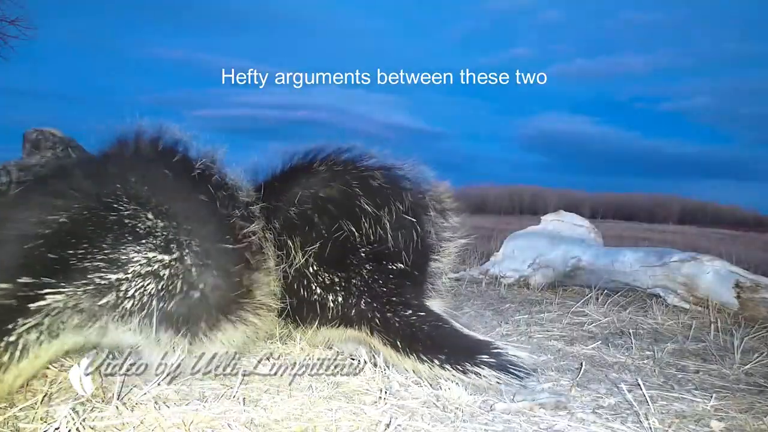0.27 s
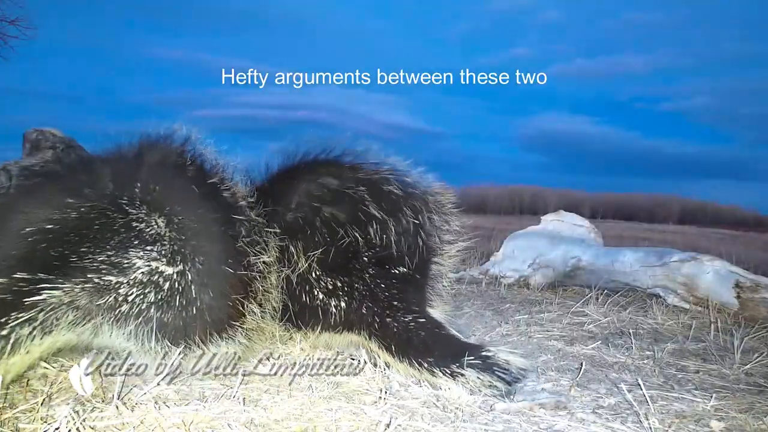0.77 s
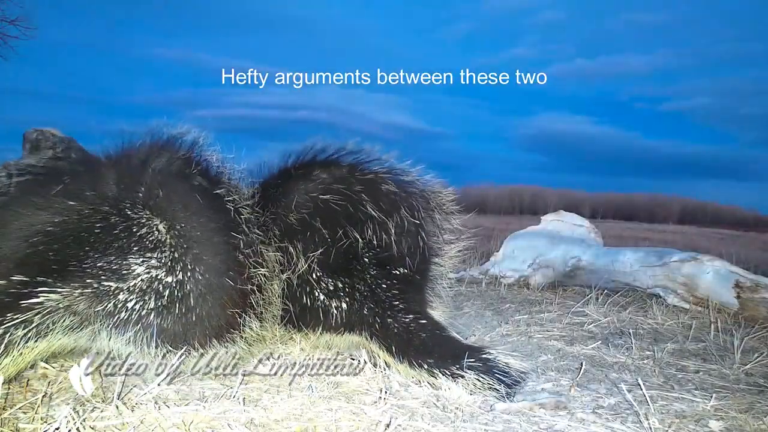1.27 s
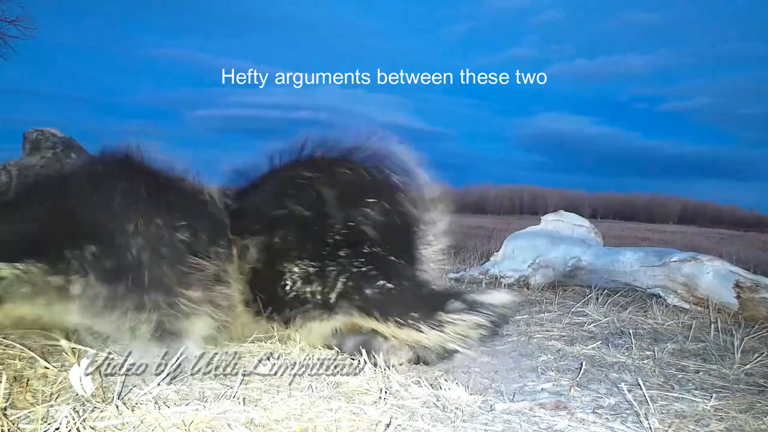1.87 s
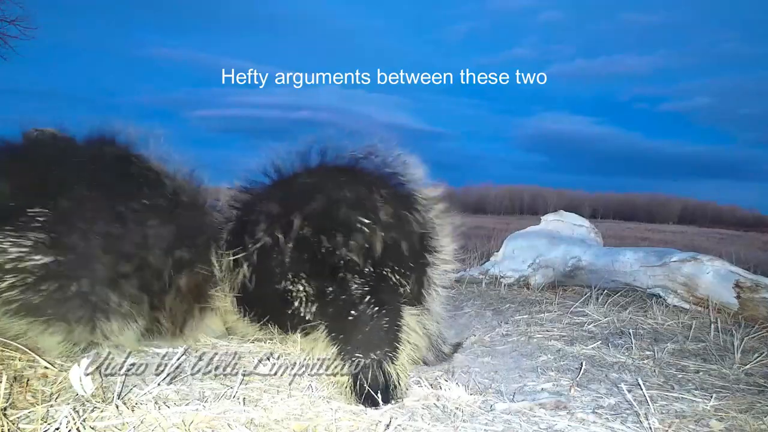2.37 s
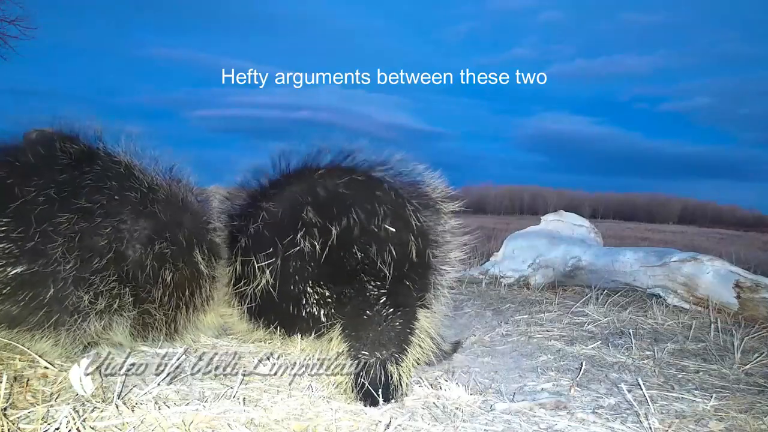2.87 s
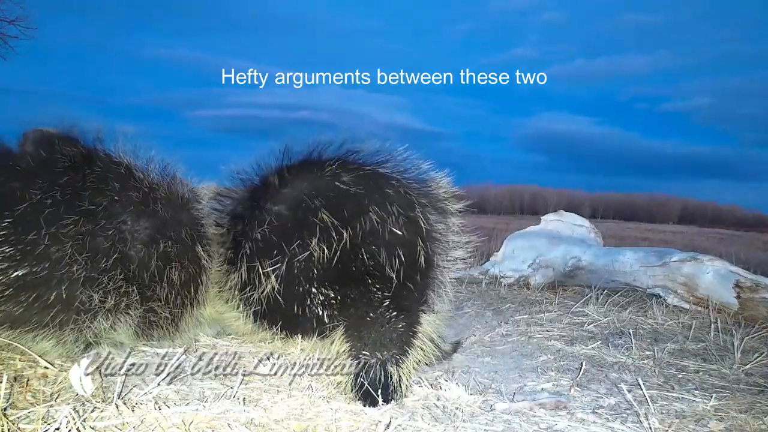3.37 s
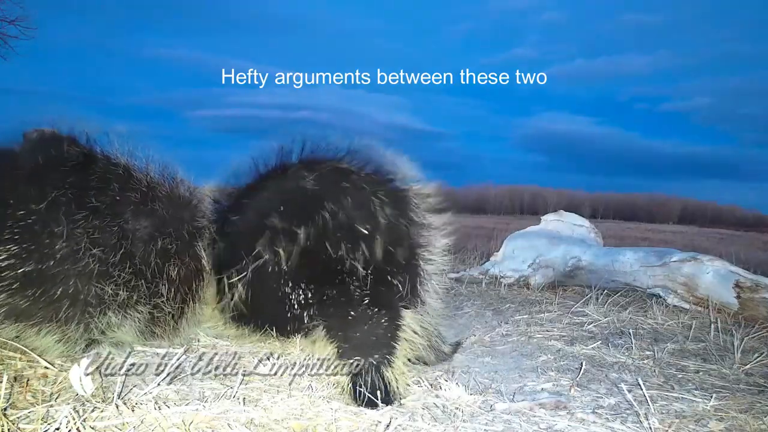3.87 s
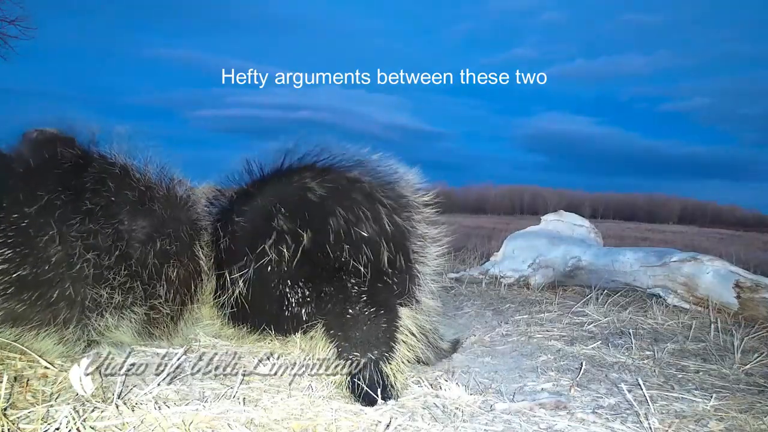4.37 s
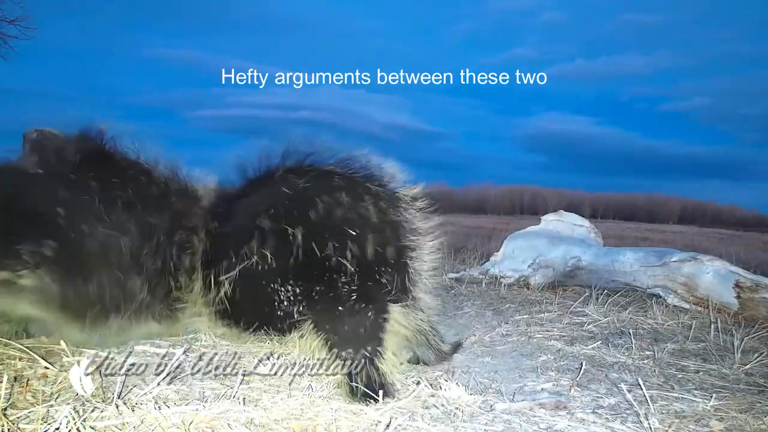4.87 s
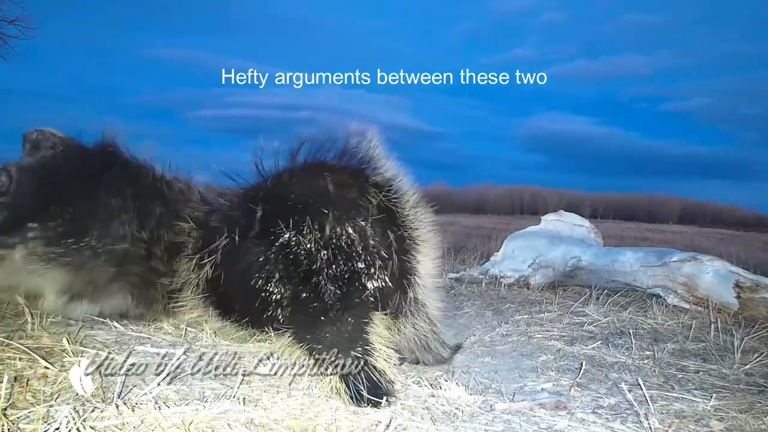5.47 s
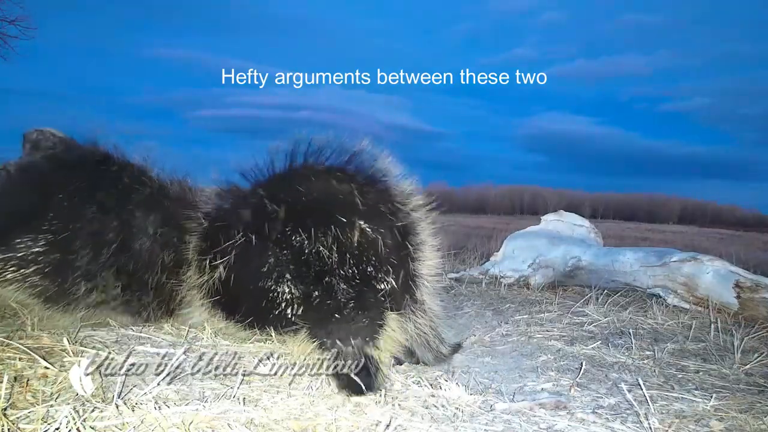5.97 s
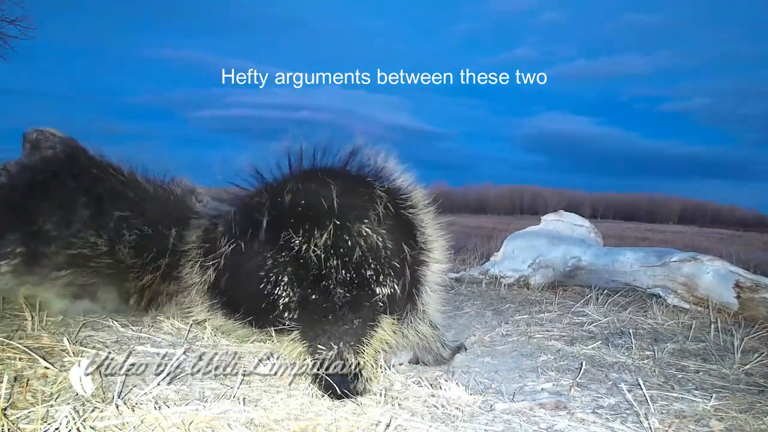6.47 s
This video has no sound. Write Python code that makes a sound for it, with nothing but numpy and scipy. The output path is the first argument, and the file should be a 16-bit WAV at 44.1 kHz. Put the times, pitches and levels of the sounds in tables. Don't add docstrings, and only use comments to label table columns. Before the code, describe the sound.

Close outdoor pickup of two porcupines arguing on straw. A faint low groan dies away, then mostly wind rumble until a high yelp falls quickly into a long buzzing moan. Gusts thump hard against the microphone around three seconds. A curt yelp answers, then another long-winded one, and a last, highest yelp with a short fading groan. Thin hiss, faint straw crackle and nostril puffs sit underneath.

```python
import sys
import numpy as np
from scipy import signal
from scipy.fft import rfft, irfft, next_fast_len
from scipy.io import wavfile
from scipy.ndimage import uniform_filter1d, map_coordinates

SR = 44100
rng = np.random.default_rng(int(sys.argv[2]) if len(sys.argv) > 2 else 0)


def gain_from_decibels(decibels):
    exponent = np.asarray(decibels, float) / 20
    return 10 ** exponent


def store_pcm(level_fs):
    pcm = np.round(np.clip(level_fs, -1, 1) * 32767).astype(np.int16)
    wavfile.write(sys.argv[1], SR, np.atleast_2d(pcm).T)


N = 296793


def unit(x):
    return x / np.sqrt(np.mean(x ** 2) + 1e-20)


def wobble(rate):
    knots = rng.standard_normal(int(N * rate / SR) + 4)
    return map_coordinates(knots, [np.arange(N) * rate / SR])


def noise(spectrum):
    m = next_fast_len(N + 8192)
    hz, db = np.transpose(spectrum)
    log_hz = np.log(np.fft.rfftfreq(m, 1 / SR) + 0.36)
    gain = gain_from_decibels(np.interp(log_hz, np.log(hz), db, left=-120, right=-120))
    return unit(irfft(rfft(rng.standard_normal(m)) * gain, m)[:N])


def mode(f, hz, width):
    return 1j * f * width / (hz * hz - f * f + 1j * f * width)


def add(track, s, shape, lead=0):
    start = max(round(s * SR) - lead, 0)
    track[start:start + len(shape)] += shape[:len(track) - start]


def bursts(t, table):
    return sum(gain_from_decibels(db) * np.exp(-((t - s) / spread) ** 2) for s, spread, db in table)


# frequency in Hz, level in dB.
HISS_SPECTRUM = [(300, 15), (1500, 8), (5000, 0.5), (14000, -0.5), (15500, -3)]
# start in seconds, end in seconds, change of gain in dB.
GAIN_DUCKS = [
    (0.243, .387, -2.5),
    (2.83, 2.94, -3),
    (3.208, 3.324, -4.5),
    (4.393, 4.491, -3.5),
]


def preamplifier_hiss():
    t = np.arange(N) / SR
    gain_db = sum(db * ((t > start) & (t < end)) for start, end, db in GAIN_DUCKS)
    return gain_from_decibels(-60.5 + gain_db) * noise(HISS_SPECTRUM)


# time in seconds, jump of the signal in dB, direction as a sign.
GAIN_STEPS = [(.0002, -41, 1), (.2408, -22, 1), (.281, -39, -1), (.3356, -30, 1), (.3873, -43, 1),
              (2.838, -36, -1), (2.8673, -35, -1), (2.9402, -33, 1), (3.2029, -22, 1), (3.3173, -33, 1),
              (4.3605, -28, 1), (4.4912, -39, -1), (4.562, -40, 1)]


def gain_jumps():
    jumps = np.zeros(N)
    drain = np.exp(-np.arange(SR // 5) / SR / 0.051)
    for s, db, sign in GAIN_STEPS:
        add(jumps, s, np.sign(sign) * gain_from_decibels(db) * drain)
    return jumps


# frequency in Hz, level in dB.
ENGINE_TONES = [(380, -62), (325, -68)]
# time in seconds, level in dB.
ENGINE_FADE = [(0, -4.5), (1.5, 6), (3, -19), (6.73, -6)]


def engine_drone():
    t = np.arange(N) / SR
    fade_db = np.interp(t, *np.transpose(ENGINE_FADE))
    out = np.zeros(N)
    for hz, db in ENGINE_TONES:
        level = gain_from_decibels(db + fade_db + 3.1 * wobble(3.6))
        out += level * np.sin(2 * np.pi * hz * t + 1.3 * wobble(8))
    return out


# time in seconds, heave level in dB.
WIND_LULL = [(0, -19), (0.65, -34.5), (1.3, -30.5), (1.7, -28.5), (2.45, -32.5), (3.05, -26), (3.75, -23),
             (4.05, -28.5), (4.55, -18.5), (5.3, -28), (5.9, -30.5), (6.73, -28)]
# time in seconds, heave in dB, buffet in dB, rise and fall time in seconds.
WIND_GUSTS = [(0.09, -13.5, -28, 0.074), (0.24, -4, -16, 0.054), (0.451, -6.5, -18, 0.042),
              (0.8, -19.5, -38.5, 0.16), (1.011, -4.5, -21, 0.041), (1.63, -17.5, -46, 0.024),
              (1.7, -19.5, -37, 0.053), (1.88, -11, -21, 0.052), (2.121, -13.5, -29, 0.045),
              (2.28, -16.5, -33, 0.051), (2.652, -9.5, -15.5, 0.049), (2.82, -5, -7, 0.044),
              (3.194, 0, -4, 0.034), (3.355, -8, -19, 0.024), (3.49, -14.5, -35, 0.039),
              (3.635, -14.5, -40, 0.031), (4.15, -9, -16, 0.043), (4.25, -22, -16.5, 0.06),
              (4.345, -5.5, -7.5, 0.028), (4.42, -5.5, -12.5, 0.042), (4.6, -17, -19.5, 0.14),
              (4.73, -5.5, -15, 0.028), (5, -8.5, -21, 0.062), (4.88, -18.5, -38, 0.044),
              (5.21, -15.5, -30, 0.049), (5.42, -11.5, -29, 0.036), (5.52, -13.5, -24.5, 0.076),
              (5.865, -13.5, -17, 0.038), (6.15, -18.5, -16.5, 0.066), (6.489, -23, -31.5, 0.048)]


def gusts():
    t = np.arange(0, N, 64) / SR
    s, heave_db, buffet_db, span = np.transpose(WIND_GUSTS)[..., None]
    distance = abs(t - s) / span
    lull = gain_from_decibels(np.interp(t, *np.transpose(WIND_LULL)))
    heave_gusts = np.linalg.norm(gain_from_decibels(heave_db) * np.exp(-distance), axis=0)
    buffet_gusts = np.linalg.norm(gain_from_decibels(buffet_db) * np.exp(-distance / 0.67), axis=0)
    heave = np.hypot(lull, heave_gusts)
    buffet = np.hypot(lull * gain_from_decibels(-9), buffet_gusts)
    return [np.interp(np.arange(N) / SR, t, c) for c in (heave, buffet)]


def evened(x, seconds):
    envelope = abs(signal.hilbert(x, next_fast_len(N))[:N])
    return unit(x / (uniform_filter1d(envelope, size=round(seconds * SR)) + .25))


# frequency in Hz, level in dB per Hz.
HEAVE_SPECTRUM = [(2, -36), (5, -10.5), (10, 3.5), (20, 2.5), (28, -8.5), (45, -30)]
BUFFET_SPECTRUM = [(15, -49), (28, -2), (60, -1), (100, -17.5), (170, -30.5), (400, -49)]
BREEZE_SPECTRUM = [(20, -41), (65, -1.5), (150, -8), (300, -17), (600, -26), (1000, -35.5), (2500, -53.5),
                   (6000, -92)]
# time in seconds, peak in dB, pitch in Hz, length in cycles.
EDDY_SLAPS = [(0.243, -30, 171, 0.61), (0.437, -24, 146, 2.4), (0.479, -29, 162, 1.25),
              (1.014, -25, 138.4, 0.94), (1.854, -25, 150.7, 0.99), (2.652, -26, 136.6, 1.55),
              (2.674, -21, 123, 1.8), (2.708, -27.5, 130, 2.1), (2.821, -20.5, 130, 0.78),
              (2.835, -18, 133, 1.2), (2.861, -27, 130, 0.67), (3.195, -9, 134, 0.79),
              (3.219, -22.5, 129, 2.24), (4.135, -26.5, 120.5, 1.5), (4.243, -16.5, 164, 1.66),
              (4.332, -24, 114, 1.1), (4.345, -14.5, 140, 1.2), (4.401, -11.5, 140, 1.6),
              (4.422, -21, 173.4, 0.72), (4.661, -29, 174, 1.3), (4.686, -15, 177, 1.5),
              (4.697, -10, 168.2, 1.27), (4.734, -19, 149.3, 1.5), (5.03, -18.5, 126, 1.51),
              (5.852, -29.5, 129, 1.5), (6.11, -26, 171, 1.28), (6.143, -25.5, 157.8, 1.28),
              (6.154, -20.5, 127, 1.64), (6.171, -28, 145.4, 0.52), (3.176, -16, 92, 1.1),
              (2.69, -23, 95, 2), (0.99, -24, 72, 1.8), (2.845, -17, 90, 1.2)]
# time in seconds, depth in dB.
CAPSULE_CREASES = [(2.8325, -16), (2.835, -13.5), (2.8425, -26), (3.178, -26), (4.35, -29), (4.3522, -18.5),
                   (4.4046, -22), (4.697, -16.5), (3.197, -35)]


def wind():
    heave_gain, buffet_gain = gusts()
    heave = heave_gain * evened(noise(HEAVE_SPECTRUM), 0.044)
    lumps = unit(gain_from_decibels(2.05 * wobble(14)) * evened(noise(BUFFET_SPECTRUM), 0.028))
    buffet = buffet_gain * gain_from_decibels(-2.5) * lumps
    breeze = gain_from_decibels(-45 + 0.68 * wobble(3.1) + 1.04 * wobble(20)) * noise(BREEZE_SPECTRUM)
    out = heave + buffet + breeze
    for s, db, hz, cycles in EDDY_SLAPS:
        u = np.arange(-SR // 10, SR // 10) / SR * hz
        swell = np.exp(-(u / (0.31 * cycles)) ** 2)
        add(out, s, gain_from_decibels(db + 3) * swell * np.cos(2 * np.pi * (u + rng.random())), lead=SR // 10)
    u = np.arange(-800, 800) / SR
    for s, db in CAPSULE_CREASES:
        add(out, s, -gain_from_decibels(db) * np.exp(-abs(u) / .0006), lead=800)
    return out


# time in seconds, spread in seconds, level in dB.
QUILL_RUSTLES = [(2.722, .016, -63), (2.785, .012, -67), (1.96, .08, -72), (5.22, .004, -64),
                 (6.005, .003, -66), (3.9, .004, -70)]


def quills():
    crackle = gain_from_decibels(7.5 * wobble(260))
    rustle = noise([(1200, -9.5), (2400, -7), (5500, -9), (8000, -38), (13000, -31)])
    return bursts(np.arange(N) / SR, QUILL_RUSTLES) * crackle * rustle


# time in seconds, spread in seconds, level in dB.
NOSTRIL_PUFFS = [(1.99, .07, -70), (2.25, .07, -73), (3.683, .003, -60), (4.647, 0.018, -62),
                 (4.92, .06, -69)]


def panting():
    air = noise([(5000, -12), (8400, -6), (9400, -2), (10500, -7), (13000, -16)])
    return bursts(np.arange(N) / SR, NOSTRIL_PUFFS) * gain_from_decibels(3 * wobble(150)) * air


# time in seconds, mouth mode in Hz, throat mode in Hz,
# nose stretch as a ratio, nose level re throat in groans in dB.
JAW_DRIFT = [(0.05, 1460, 3530, 1, 0), (0.18, 1420, 3000, 1, 6), (0.35, 1360, 3120, 1, 1),
             (0.45, 1302, 3230, 1.05, 1), (1.55, 1480, 3170, 1.02, -8), (1.69, 1640, 3550, 1.02, -4),
             (1.75, 1660, 3250, 1.02, -7), (1.81, 1720, 2780, .99, -8), (1.88, 1570, 2750, 0.95, 5),
             (1.95, 1562, 2727, 0.99, 7), (2.08, 1379, 3102, 1.03, 13), (2.25, 1375, 3490, 1.03, 2),
             (3.6, 1348, 3410, 1, -2), (3.78, 1264, 3350, 1.03, -1), (4.63, 1430, 3510, 1.03, -3.5),
             (4.72, 1560, 3520, 1, -3), (4.8, 1540, 3591, 1.03, -1), (4.86, 1540, 3455, 0.95, 2),
             (4.91, 1500, 3348, 1.08, -1), (4.95, 1590, 3400, 1.14, -9), (5.0, 1692, 2800, 1.15, -17),
             (5.06, 1699, 2800, 0.97, 8), (5.13, 1480, 3000, 0.93, 10), (5.2, 1409, 3422, 1.03, 4),
             (6.1, 1543, 3342, 1.046, -13), (6.28, 1370, 3435, 1.08, -4)]
# time in seconds, pitch in Hz, effort in dB, upper modes re mouth in dB.
LONG_WINDED_GROANS = [
    [(0.0, 134.2, -52, -14), (0.096, 128, -57.5, -18), (0.132, 139.1, -62.5, -14.5),
     (0.19, 134.5, -58, -13), (0.24, 130.7, -58, -14.5), (0.27, 137.5, -65, -13), (0.36, 145.3, -58.5, -13),
     (0.418, 145.3, -53.5, -28), (0.465, 140, -65, -33)],
    [(1.625, 163, -45, -23), (1.66, 162.8, -44, -32), (1.71, 170.1, -41.5, -24.5),
     (1.763, 178.5, -41.5, -23.5), (1.837, 161, -45, -35), (1.86, 148.8, -51, -27)],
    [(1.884, 139.3, -46, -22), (1.932, 142.7, -44.5, -20.5), (1.97, 181.2, -47, -22),
     (2.0, 179.7, -48, -34), (2.075, 168, -54, -26), (2.138, 152.5, -53.5, -28), (2.2, 170.1, -52.5, -30),
     (2.24, 154.4, -51.5, -11.5), (2.325, 148.4, -63, -22)],
]
LONG_WINDED_LATE_GROANS = [
    [(4.725, 150, -42.5, -4.5), (4.75, 148, -45.5, -10), (4.785, 146.5, -45.5, -18),
     (4.82, 146.9, -46.5, -13.5), (4.944, 172.4, -43, -19), (4.985, 165.2, -44, -26),
     (5.038, 157.7, -45.5, -27), (5.11, 148.7, -52.5, -21), (5.132, 156, -48, -20),
     (5.145, 158.1, -66, -13)],
    [(5.175, 205.3, -59, -16), (5.215, 170.1, -54, -34), (5.283, 167, -54.5, -11), (5.393, 153.2, -62, -19),
     (5.4, 154, -76, -28)],
]
CURT_GROANS = [
    [(3.735, 186.1, -59, -6), (3.755, 192.5, -58, -14), (3.79, 201.4, -60, -15), (3.816, 199.4, -50, -23),
     (3.874, 185.7, -61.5, -13), (3.98, 196, -75, -15)],
    [(6.14, 171, -48, -16), (6.22, 176.2, -57, -19), (6.262, 200.3, -58.5, -24), (6.306, 198.5, -58, -22),
     (6.444, 185.5, -68, -19), (6.45, 187.1, -80, -14)],
]


def groan_controls(t):
    groans = sorted(LONG_WINDED_GROANS + LONG_WINDED_LATE_GROANS + CURT_GROANS)
    s, *cols = np.transpose(sum(groans, []))
    pitch, effort_db, upper_db = (np.interp(t, s, c) for c in cols)
    drift_s, *_, nose_re_throat = np.transpose(JAW_DRIFT)
    nose_db = np.interp(t, drift_s, nose_re_throat)
    chest_db = -52 + 0.24 * (effort_db + 51) + 0.1759 * (pitch - 160)
    top_db = effort_db + upper_db
    gains = gain_from_decibels([chest_db, effort_db, top_db - nose_db / 2, top_db + nose_db / 2, top_db - 14.5])
    gate = sum((t > rows[0][0] - .013) & (t < rows[-1][0] + .002) for rows in groans)
    for a, b in zip(groans, groans[1:]):
        end, start = a[-1][0], b[0][0]
        if start - end < .027:
            gate = gate + ((t > end) & (t < start))
    return gate, pitch, gains


# onset in seconds, catch of the voice in seconds, top pitch in Hz,
# middle of the drop in seconds, drop time in seconds.
YELP_EVENTS = [
    (1.482, 1.509, 950, 1.547, .016),
    (3.597, 3.603, 862, 3.658, .012),
    (4.602, 4.629, 840, 4.66, .0145),
    (6.02, 6.024, 1015, 6.086, .0145),
]
# chest, mouth, throat, nose and sinus in dB.
YELP_LEVELS = [(-38, -43.5, -39.5, -49.5, -59.5), (-37, -40.5, -31.5, -37, -52.5),
               (-36, -30.5, -27.5, -31.5, -46.5), (-34.5, -33.5, -40, -42.5, -48)]
# mouth, throat, nose and sinus in seconds.
YELP_HOLDS = [(0.051, 0.057, .058, .05), (0.035, 0.035, 0.033, 0.016), (0.024, 0.025, 0.022, .008),
              (0.041, .048, .012, .012)]
# chest, mouth, throat, nose and sinus in dB.
YELP_LEADS = [(-13, -16, -14, -26, -22), (-4, -4, -4, -5, -3), (-9, -1.5, -10.5, -14, -32),
              (-8, -3, -12, -10, -8)]
# chest, mouth, throat, nose and sinus in dB.
YELP_SAGS = [(0, -6, 5, 0, 2), (0, -8, 3.5, -5.5, -6), (0, 6, 7, 3, 13), (7, 5, 7.5, 13, 11)]
# share of the
# pitch, time in seconds.
YELP_SCOOPS = [(.15, .013), (-.12, .004), (.08, 0.00451), (-.03, .0045)]


def controls(t):
    gate, pitch, gains = groan_controls(t)
    loose = np.zeros(N)
    release_db_per_s = np.c_[[435, 650, 704, 800, 600]]
    tables = zip(YELP_EVENTS, YELP_LEVELS, YELP_HOLDS, YELP_LEADS, YELP_SAGS, YELP_SCOOPS)
    for event, voice_db, upper_hold, lead_db, sag_db, (scoop, scoop_s) in tables:
        onset, catch, top_hz, middle, drop = event
        now = (t >= onset - .01) & (t < middle + .15)
        age = np.maximum(t[now] - onset, 0)
        tension = 1 / (1 + np.exp((np.maximum(t[now], catch) - middle) / drop))
        lead = 1 / (1 + np.exp((t[now] - catch) / 0.0018))
        loose[now] = np.maximum(lead, 14 * (catch - onset))
        yelp_hz = top_hz * (1 - scoop * np.exp(-age / scoop_s))
        pitch[now] += tension * (yelp_hz - pitch[now])
        hold = np.c_[[0.046, *upper_hold]]
        shape_db = -28 * np.exp(-age / 0.0028) + np.c_[list(lead_db)] * lead
        shape_db = shape_db - np.c_[list(sag_db)] * (1 - tension)
        shape_db = shape_db - release_db_per_s * np.maximum(t[now] - middle - hold, 0)
        yelp_gains = gain_from_decibels(np.c_[list(voice_db)] + shape_db)
        gains[:, now] = np.hypot((1 - tension) ** 2 * gains[:, now], yelp_gains)
        gate = gate + ((t >= onset) & (t < middle + .09))
    return np.clip(gate, 0, 1), loose, pitch, *(20 * np.log10(gains))


def steady(h, share, pitch):
    passing = np.linalg.norm(h, axis=0) * np.sqrt(pitch)
    even = h / np.sqrt(np.sum(abs(h) ** 2, axis=0) / 2)
    return even * (passing / np.median(passing)) ** share


# frequency in Hz, width in Hz, level in dB.
SINUS_MODES = [(6080, 930, 7), (7500, 900, -25), (9400, 900, -28)]


def resonances(f, t, cheek, ceiling_hz):
    pitch = f[0]
    drift_s, *drift = np.transpose(JAW_DRIFT)
    mouth_hz, throat_hz, stretch, _ = (np.interp(t, drift_s, c) for c in drift)
    lips = 1.034 * mouth_hz
    skirt = 4.7
    chest = -1j * np.sqrt(2) * (pitch / f) ** 1.3 / (1 + (f / 1250) ** 4)

    mouth = mode(f, lips, 155) * mode(f, cheek * lips, 305) / (1 + (f / lips / 1.61) ** 14)

    throat = mode(f, throat_hz, 246) * mode(f, throat_hz, skirt * 246)
    throat = throat / (1 + (0.8 * throat_hz / f) ** 8) / (1 + (f / throat_hz / 1.85) ** 8)

    nose = mode(f, 1.006 * 4320 * stretch, 370) * mode(f, 4320 * stretch, skirt * 370)
    nose = nose / (1 + (4000 / f) ** 10) / (1 + (f / stretch / 5200) ** 16)

    sinus = sum((-1) ** k * gain_from_decibels(db) * mode(f, hz, w) for k, (hz, w, db) in enumerate(SINUS_MODES))
    sinus = sinus / (1 + (5200 / f) ** 10) / (1 + (f / ceiling_hz) ** 22)

    snap = 1 / (1 + (2900 / f) ** 4) / (1 + (f / 8200) ** 16) + 0j
    shares = [(mouth, .82), (throat, .57), (nose, .57), (sinus, .3), (snap, 0)]
    return chest, *(steady(h, share, pitch) for h, share in shares)


def breath_noise(mouth_db, throat_db, nose_db, sinus_db, weak):
    throat = noise([(2400, -22), (3000, -6), (3450, 0), (4100, -9), (4600, -22)])
    nose = noise([(3800, -20), (4550, 0), (5200, -8), (5700, -24)])
    sinus = noise([(5000, -14), (6200, 0), (6900, -6), (7800, -26), (9400, -26), (10200, -44)])
    rasp = noise([(800, -22), (1150, 0), (1800, 0), (2300, -26)])
    breath = gain_from_decibels(throat_db - 5.5) * throat + gain_from_decibels(nose_db - 5.5) * nose + gain_from_decibels(sinus_db - 1) * sinus
    return breath + gain_from_decibels(mouth_db - 16 + 5 * weak) * rasp


# time in seconds, cheek mode re lips as a ratio, sinus ceiling in Hz,
# fraying from 0 to 2, sinus level in dB.
HEAD_POSTURE = [(0, 0.84, 6700, 0.14, -3), (.46, .9, 6700, .1, -3), (1.5, 0.69, 6500, 0.38, -1),
                (1.65, 0.75, 6460, 0.39, -1), (1.72, 0.73, 6410, .4, 10), (1.8, 0.71, 6400, .4, 0),
                (2, .82, 6400, .4, -3), (2.3, 0.8, 6400, .6, -3), (3.6, 0.72, 6990, 0.99, 0),
                (3.64, 0.77, 7160, 1.1, 3), (3.68, 0.77, 7900, 1.18, -2), (3.715, .74, 7000, 1, -7),
                (4, 0.73, 7000, 1.2, -5), (4.6, 0.78, 8050, .6, 2), (4.66, .72, 7810, 0.58, -1),
                (4.71, .76, 6500, .6, -5), (4.88, 0.73, 6300, .7, 0), (4.94, 0.7, 6294, .7, 8),
                (4.99, 0.73, 6310, .8, -4), (5.4, 0.81, 6500, 0.89, -3), (6, 0.77, 8300, 1.5, -0.5),
                (6.1, .74, 7800, 1.6, -1.5), (6.17, 0.7, 6900, 1.46, 7), (6.45, 0.7, 6900, 1.6, 0)]
# time in seconds, level in dB.
FOLD_SNAPS = [(3.673, -57), (3.683, -51), (3.692, -59), (3.706, -66), (6.114, -63), (6.1245, -58),
              (6.13, -51), (6.158, -68), (6.181, -68), (4.944, -68), (4.954, -66)]
# start in seconds, end in seconds, depth from 0 to 1.
PERIOD_DOUBLING = [
    (3.72, 3.8, 0.3),
    (6.165, 6.23, .4),
    (6.27, 6.44, .2),
    (3.82, 3.95, .15),
    (5.08, 5.14, 0.32),
    (2.06, 2.2, 0.16),
]


def voices():
    t = np.arange(N) / SR
    gate, loose, *cols = controls(t)
    gate = uniform_filter1d(gate * 1., size=140)
    on = np.flatnonzero(gate > 0)
    knots = on[::32]
    pitch, chest_db, mouth_db, throat_db, nose_db, sinus_db = (uniform_filter1d(c, size=120) for c in cols)
    head_s, *head = np.transpose(HEAD_POSTURE)
    cheek, ceiling_hz, fray, shine_db = (np.interp(t, head_s, c) for c in head)

    slack = np.maximum(np.clip((560 - pitch) / 260, .2, 1), 0.908 * loose)
    groaning = np.clip((200 - pitch) / 30, 0, 1)
    weak = fray * np.clip((230 - pitch) / 30, 0, 1) * np.clip((-44 - mouth_db) / 10, 0, 1)
    jitter = (slack + .2 * weak) * (0.00726 * wobble(45) + 0.00704 * wobble(170))
    tumble = .019 * slack * np.clip((pitch - 190) / 80, 0, 1) * wobble(450)
    pitch = pitch * (1 + jitter + tumble)
    turn = 2 * np.pi * np.cumsum(pitch) / SR

    chest_db = chest_db + 5.15 * groaning
    throat_db = throat_db + 1.2 * slack * wobble(140) + 1.5 * groaning * wobble(25)
    nose_db = nose_db + 1.3 * slack * wobble(140) + 1.5 * groaning * wobble(25)
    sinus_db = sinus_db + shine_db + 3 * slack * wobble(140)
    shaken_mouth_db = mouth_db + (0.89 * slack + 2.5 * weak) * wobble(120)
    snap_gain = sum(gain_from_decibels(db) * np.exp(-((t - s) / .0022) ** 2) for s, db in FOLD_SNAPS)

    f = np.arange(1, 61)[:, None] * pitch[knots]
    chest, mouth, throat, nose, sinus, snap = resonances(f, t[knots], cheek[knots], ceiling_hz[knots])
    h = gain_from_decibels(chest_db)[knots] * chest + gain_from_decibels(shaken_mouth_db)[knots] * mouth
    h = h + gain_from_decibels(throat_db)[knots] * throat - gain_from_decibels(nose_db)[knots] * nose
    h = h + gain_from_decibels(sinus_db)[knots] * sinus + snap_gain[knots] * snap
    out = np.zeros(N)
    spin = np.exp(1j * turn[on])
    partial = spin
    for row in h:
        out[on] += (np.interp(on, knots, row) * partial).real
        partial = partial * spin

    puffs = slack * (1 + np.cos(turn - .8)) ** 2 / 2
    out = out + puffs * breath_noise(mouth_db, throat_db, nose_db, sinus_db, weak)
    depth = sum(np.clip(d, 0, 1) * ((t > a) & (t < b)) for a, b, d in PERIOD_DOUBLING)
    return gate * (1 + uniform_filter1d(depth, size=400) * np.cos(turn / 2)) * out


def scene():
    return (engine_drone() + wind() + quills() + panting() + voices())[None]


def top_cut(x):
    return signal.sosfilt(signal.butter(12, 15780, fs=SR, output="sos"), x)


def record(dry):
    clipped = dry / (1 + abs(dry / .94) ** 6) ** (1 / 6)
    return top_cut(clipped + gain_jumps() + preamplifier_hiss())


dry = scene()
out = record(dry)
store_pcm(out)
```